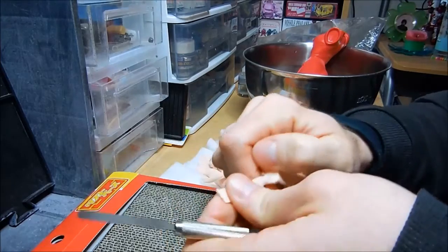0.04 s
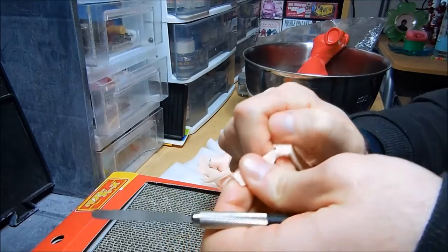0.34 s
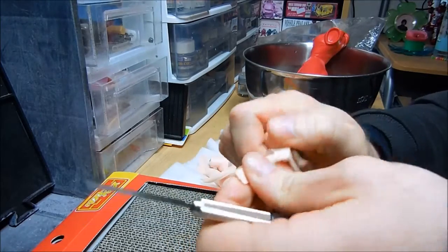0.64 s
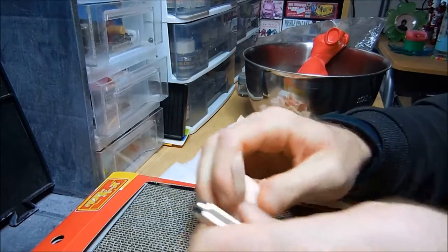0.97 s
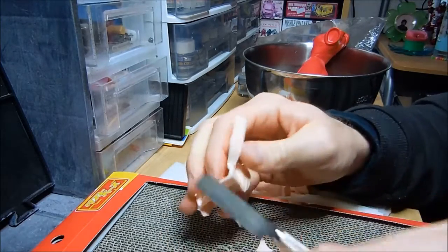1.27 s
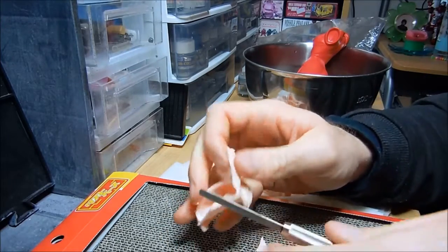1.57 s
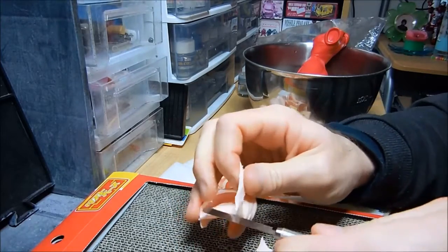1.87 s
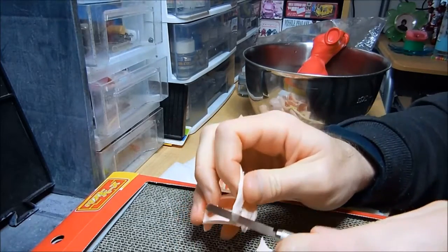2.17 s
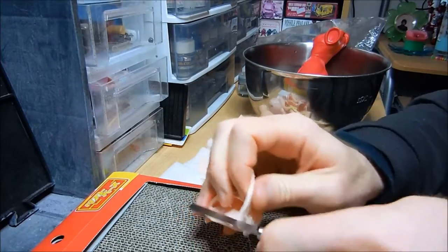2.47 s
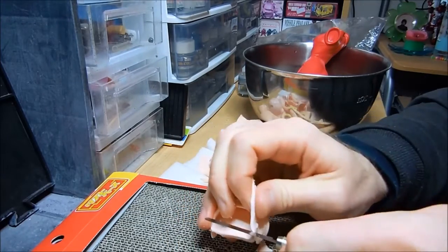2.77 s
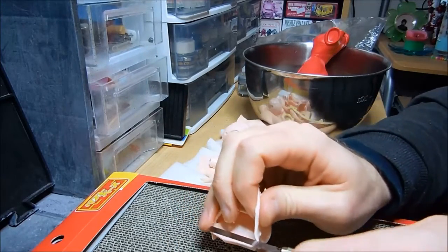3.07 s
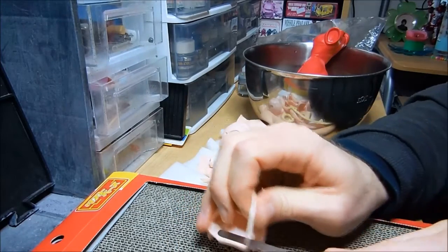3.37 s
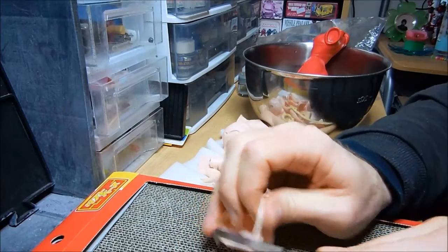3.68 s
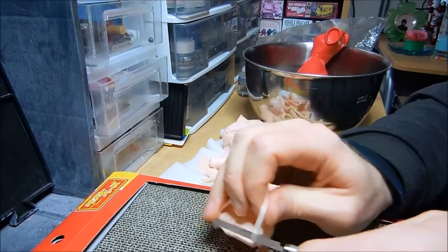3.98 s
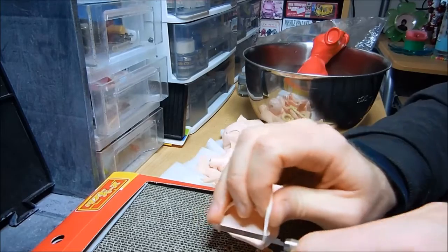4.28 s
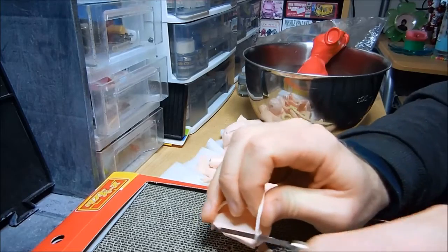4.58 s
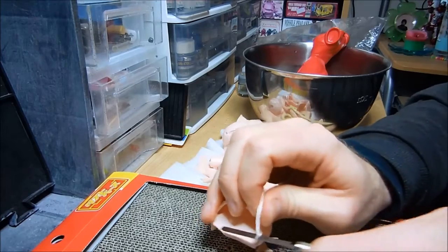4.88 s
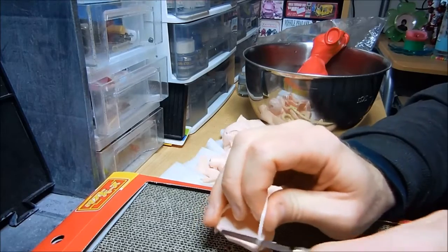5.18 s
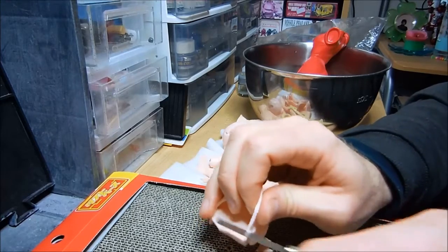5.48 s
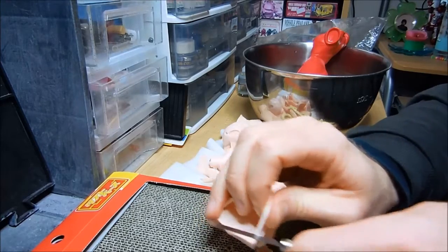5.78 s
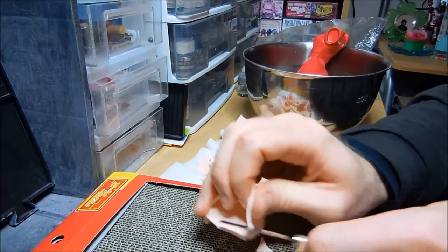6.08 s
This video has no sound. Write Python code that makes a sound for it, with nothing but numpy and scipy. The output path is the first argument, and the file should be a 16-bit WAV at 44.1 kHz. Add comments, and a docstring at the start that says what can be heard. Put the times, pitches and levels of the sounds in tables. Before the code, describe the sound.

A small blade trims a hand-held piece of soft vinyl in short, dry, ticking scrapes and snaps in a quiet room.

```python
"""At a workbench in a small, faintly humming room, a small blade trims a hand-held piece of soft vinyl.
In each cut the pressure swells and fades while the edge sticks and slips in a quick uneven run of dry
ticks, rasping between them; now and then it snaps through. Fingers rub the part, hands bump softly,
a sleeve rustles. Bench, boxes and room reflect the cutting and rubbing."""
import sys
import numpy as np
from scipy import signal
from scipy.fft import rfft, irfft
from scipy.io import wavfile
from scipy.ndimage import uniform_filter1d

SR = 44100
rng = np.random.default_rng(int(sys.argv[2]) if len(sys.argv) > 2 else 0)


def transcribe(u):
    """Save the signal u as a 16-bit wav file named by the first command-line argument.

    u: samples, shape (n,) or (channels, n), limited to [-1, 1]; the rate is SR.
    q: integer samples, one column per channel.
    """
    v = np.clip(np.atleast_2d(u).T, -1, 1)
    q = np.round(v * 32767).astype(np.int16)
    wavfile.write(sys.argv[1], SR, q)


N = 275184

# Cuts through the vinyl. Each row: hardest moment, rise and fall in seconds, strength in dB,
# extra body near 1 kHz in dB, extra edge (treble) in dB.
CUTS = [(1.835, .01, 0.031, -53, 0.5, -2.5), (2.441, .034, 0.032, -43, 5, -1),
        (3.254, .004, 0.037, -40, 2, -3), (3.4163, .009, .012, -54.5, 11, -2),
        (3.695, .007, 0.062, -30.5, -1.5, -3), (3.83, 0.056, 0.033, -33, 8, 4),
        (3.99, 0.016, 0.031, -40.5, -0.5, 0), (4.058, .005, .022, -53, 3, 4),
        (4.2255, .014, 0.03, -35.5, 1.5, -6), (4.369, 0.018, .036, -34.5, -0.5, 4),
        (4.527, 0.016, 0.014, -49, -1, 4.5), (4.607, .005, 0.019, -53, 6, 2),
        (4.7428, 0.028, 0.04, -42.5, 0, -2), (4.8841, 0.045, 0.034, -40, -5.5, 1.5),
        (5.0233, .005, 0.039, -50, 3, 4.5), (5.3806, 0.018, 0.053, -46.5, 2, 4),
        (5.5263, 0.035, .043, -44.5, 2, 3.5), (5.9245, .004, 0.025, -55, -2, -2),
        (6.0709, 0.0084, 0.058, -42.5, 1, 2.5)]
TICK_RING_HZ = 2820  # a bright ring colouring ticks and rasps


def stick_slip(per_side=10, gap_s=.0066, gap_spread=.25, lesser_db=-2.5,
               spread_db=4, body_spread_db=3.5, ring_spread=.04):
    """The edge sticks and slips unevenly around each cut's hardest moment, each bite to its own depth."""
    rows = []
    lesser = np.arange(-per_side, per_side + 1) != 0
    for hardest_s, rise_s, fall_s, db, body_db, edge_db in CUTS:
        gap, size, depth, ring = rng.standard_normal((4, len(lesser))) * lesser
        t = np.cumsum(gap_s * np.exp(gap_spread * gap))
        t -= t[per_side]
        slip_db = db + pressure_db(t, rise_s, fall_s) + lesser_db * lesser + spread_db * np.tanh(size)
        bite_db = body_db + body_spread_db * depth
        ring_hz = TICK_RING_HZ * (1 + ring_spread * ring)
        rows += zip(hardest_s + t, slip_db, bite_db, np.full(len(t), edge_db), ring_hz)
    return slips(rows, creep=.57, ring_db=6)


def snaps():
    """Single snaps as the edge bites in or breaks through."""
    # Each row: time in seconds, strength, extra body and extra edge in dB, bright ring in Hz.
    breaks = [(1.983, -55.5, 6, -11, 2780), (2.0305, -42, -7.5, 0, 3590), (2.12, -64, 2, -3, 2800),
              (2.3829, -30.5, 1.5, -9.5, 3000), (2.3865, -36, -1, 0, 2900), (2.4101, -33.5, 5.5, -1, 3040),
              (2.4621, -43.5, 11, 3, 3020), (2.4672, -41.5, 4, -10, 1750), (2.7276, -51, -4, 9, 3840),
              (2.758, -63.5, -7, 16.5, 2800), (2.906, -58.5, 2, 13.5, 2770),
              (3.0612, -42.5, -29, 4.5, 3050), (3.2488, -30.5, 3, -1.5, 3140), (3.2674, -42, 0.5, 1, 2870),
              (3.6859, -16, -11.5, -7.5, 2860), (3.7886, -43.5, 8, 6, 3200), (3.7995, -39.5, 6, 3, 2900),
              (3.8681, -41, -7, -3, 2600), (3.9646, -30, -5, -8.5, 2840), (4.0672, -39, 12, 2, 2970),
              (4.2185, -30, -8, -2.5, 2850), (4.3415, -39, 3, 7.5, 3130), (4.3548, -34, -1, 3.5, 3020),
              (4.359, -34, -7, 4.5, 2790), (4.6119, -37.5, -3.5, -2, 2760), (4.7295, -46.5, 2, 0, 2740),
              (4.8541, -39, 3.5, 4, 2600), (4.8587, -39, -1.5, 13, 2550), (4.8787, -36, 0.5, 7, 3200),
              (4.9043, -46, 7.5, 7, 2900), (5.13, -42.5, -1.5, -1, 2570), (5.3535, -39.5, -9, -2.5, 2760),
              (5.3806, -38.5, -7, 3.5, 2680), (5.5523, -43, -0.5, 0.5, 2510), (5.6491, -53.5, 5, 7.5, 1770),
              (5.9346, -44.5, 3, 9, 2580)]
    return slips(breaks, creep=.61, ring_db=7)


def slips(rows, creep, ring_db, build_s=.00052, tear_s=.00086, creep_s=.00094,
          split_hz=4800, clean_db=-36, size=512):
    """Fine tearing builds, the edge lets go in one dull jolt, the tearing dies away."""
    out = np.zeros((2, N))
    t = (np.arange(size) - size // 4) / SR
    dull, bright = (signal.butter(2, split_hz, kind, fs=SR, output="sos") for kind in ("low", "high"))
    tear_envelope = np.exp(-np.maximum(-t / build_s, t / tear_s))
    for at_s, db, body_db, edge_db, ring_hz in rows:
        white = rng.standard_normal((4, size))
        if np.isinf(db):  # outside the stroke
            continue
        ragged = creep / (1 + amp(2 * (db - clean_db)))  # hard slips break clean, light ones crumble
        crumble = white[3] * np.exp(-abs(t) / creep_s)
        release = np.sqrt(1 - ragged) * (t == 0) + np.sqrt(ragged) * crumble / np.linalg.norm(crumble)
        tear = signal.sosfilt(bright, stereo(white[0], white[1:3]) * tear_envelope)
        force = signal.sosfilt(dull, release) + tear / np.linalg.norm(tear[0])
        response = tick(body_db, edge_db, ring_hz, ring_db)
        add(out, at_s + t[0], amp(db) * signal.fftconvolve(force, response[None], axes=1))
    return out


def tick(body_db, edge_db, ring_hz, ring_db, ring_width_hz=460, blade_share=1,
         half_free_db=-.5, edge_hz=4100, size=2048):
    """Minimum-phase response to one slip, with a bright ring: deep adds body, fine adds edge."""
    # Broad colour of a slip. Each row: frequency in Hz, level in dB.
    colour = [(60, -0.5), (250, 4.5), (480, 14.5), (680, 19), (1050, 25), (1600, 23), (2400, 26.5),
              (3250, 25.5), (4100, 18), (5400, 19.5), (7500, 12.5), (11000, 13.5), (14000, 9), (16000, -13)]
    # Where a deep cut adds body. Each row: frequency in Hz, share of body_db.
    body = [(350, 0.61), (700, 0.98), (1300, 0.87), (1900, 0.13)]
    # Modes of the part with its surroundings, and of the free blade.
    # Each row: centre in Hz, width in Hz, lift in dB.
    part_modes = [(698, 46, 5), (1003, 70, 5.5), (1219, 109, 9), (4780, 710, 1.5), (8850, 580, 5)]
    blade_modes = [(1850, 130, 10), (2900, 470, 3), (3150, 230, 4), (6060, 330, 11)]
    hz = abs(np.fft.fftfreq(size, 1 / SR))
    db = read(colour, hz) + resonance_db([*part_modes, (ring_hz, ring_width_hz, ring_db)], hz)
    db += body_db * read(body, hz)
    db += edge_db * (1 - 1 / (1 + (hz / edge_hz) ** 8))
    # Deep vinyl damps the blade; a shallow slip frees its modes, which shift in step with ring_hz.
    free = 1 / (1 + amp(2 * (body_db - half_free_db)))
    db += blade_share * free * resonance_db(blade_modes, hz * TICK_RING_HZ / ring_hz)
    spectrum = np.exp(signal.hilbert(np.log(amp(db))).conj())
    return np.fft.ifft(spectrum).real[:size // 2]


def pressure_db(t, rise_s, fall_s, fade_db=17.5, roundness=1.36):
    """Stroke pressure: swells to t = 0, then fades; no contact outside the stroke."""
    away = np.maximum(-t / rise_s, t / fall_s)
    return np.where(away <= 1, -fade_db * away ** roundness, -np.inf)


def blade_rasp():
    """The edge rasps between slips."""
    return amp(-11.5) * friction(CUTS, grains_per_s=5000, catches_per_s=170, catch_db=10.5, grit_db=2,
                                 ring_hz=2860, ring_db=4, ring_width_hz=520, blade_share=.92)


def finger_rubs():
    """Fingers slide over part and handle."""
    # Each row: hardest moment, rise and fall in seconds, level, extra body and extra edge in dB.
    rubs = [(.62, .03, 0.073, -59.5, 5, 7), (.715, 0.017, .05, -62.5, -4, 5),
            (.83, 0.073, .025, -56.5, -5, 5), (.855, .02, 0.011, -42, -13.5, -7),
            (1.1, .17, .05, -66.5, 4, 7), (1.33, 0.093, 0.075, -65.5, 0, 12),
            (1.49, 0.017, 0.015, -52, 2, 12.5), (2.71, 0.088, .05, -66.5, 3, 12),
            (3.28, 0.012, .09, -61, 3, 14), (3.645, 0.034, 0.026, -61.5, 10, 7),
            (5.215, 0.029, 0.084, -63, 7, 7), (5.825, 0.02, 0.043, -62.5, -6, 12)]
    return friction(rubs, grains_per_s=8900, catches_per_s=130, catch_db=9, grit_db=3,
                    ring_hz=2710, ring_db=13, ring_width_hz=660, blade_share=.2)


def friction(strokes, grains_per_s, catches_per_s, catch_db, grit_db,
             ring_hz, ring_db, ring_width_hz, blade_share):
    """Tiny releases under swelling and fading pressure, strongest each time the contact catches."""
    out, t = np.zeros((2, N)), np.arange(N) / SR
    sizes = np.tanh(rng.standard_normal((3, N))) * (rng.random(N) < grains_per_s / SR)
    sizes *= amp(grit_db * np.minimum(rng.exponential(size=N), 5))  # a few much coarser grains
    pace = np.exp(.4 * unit(uniform_filter1d(rng.standard_normal(N), size=200)))
    catch_phase = np.cumsum(catches_per_s * pace) / SR % 1
    for hardest_s, rise_s, fall_s, db, body_db, edge_db in strokes:
        at = np.flatnonzero((t > hardest_s - rise_s) & (t < hardest_s + fall_s))
        grains = stereo(sizes[0, at], sizes[1:, at]) * amp(-catch_db * catch_phase[at])
        response = tick(body_db, edge_db, ring_hz, ring_db, ring_width_hz, blade_share)
        rasp = unit(signal.fftconvolve(grains, response[None], axes=1)[:, :len(at)])
        add(out, t[at[0]], rasp * amp(db + pressure_db(t[at] - hardest_s, rise_s, fall_s)))
    return out


def hand_bumps(bump_hz=292, rise_cycles=1.88, softness=4.48, rebound_db=-13, rebound_s=.017):
    """Padded blows swell and die within a few cycles, then rebound once, weakly."""
    # Dull bumps of the hands. Each row: start in seconds, peak in dB.
    bumps = [(2.91, -51.5), (3.106, -53.5), (3.32, -54), (3.974, -54), (4.173, -52), (4.962, -54),
             (5.456, -55.5), (6.015, -55.5), (6.223, -52)]
    # One light knock as the grip changes: start in seconds, peak in dB, pitch in Hz.
    knock = (1.4348, -48.5, 900)
    out, t = np.zeros(N), np.arange(SR // 10) / SR
    for start_s, db, hz in [knock] + [(*bump, bump_hz) for bump in bumps]:
        age = t * hz / rise_cycles
        envelope = (age * np.exp(1 - age)) ** softness
        blow = -amp(db) * envelope * np.sin(2 * np.pi * hz * t)
        add(out, start_s, blow)
        add(out, start_s + rebound_s, amp(rebound_db) * blow)
    return out


def bench_reflections(x, clutter_db=-15, clutter_t60_s=.066, room_db=-15.5):
    """Direct sound, single echoes, scatter from nearby clutter and the room's short tail."""
    # Echoes off bench, hands and boxes, a left and a right list. Each row: delay in ms, gain.
    echoes = [
        [(1.06, .08), (1.42, 0.22), (2.87, 0.19)],
        [(.7, 0.13), (1.06, 0.055), (2.87, 0.52)],
    ]
    # Room decay. Each row: frequency in Hz, T60 in seconds.
    room_decay = [(200, 0.82), (1000, 0.14), (3000, 0.15), (12000, 0.049)]
    paths = amp(clutter_db) * scatter([(1000, clutter_t60_s)], onset_s=.002)
    paths += amp(room_db) * scatter(room_decay, onset_s=.006)
    paths[:, 0] += 1
    ms = np.arange(paths.shape[1]) * 1000 / SR
    paths += [sum(gain * np.sinc((ms - delay_ms) / ms[1]) for delay_ms, gain in side) for side in echoes]
    return signal.fftconvolve(x, paths, axes=1)[:, :N]


def scatter(decay, onset_s):
    """Dense stereo reflections of about unit energy, dying band by band."""
    hz, t, bands = signal.stft(rng.standard_normal((3, SR // 2)), SR, nperseg=128)
    tails = signal.istft(bands * amp(-60 * t / read(decay, hz)[:, None]), SR, nperseg=128)[1]
    tails = np.pad(tails, ((0, 0), (round(onset_s * SR), 0)))[:, :SR // 3]
    tails /= np.linalg.norm(tails[0])
    return stereo(tails[0], tails[1:])


def sleeve():
    """Cloth rustles faintly, mostly at the start."""
    # Each row: time in seconds, level in dB.
    levels = [(0, -63.5), (.12, -68), (.3, -75.5), (.6, -72), (.9, -97), (1.3, -89), (1.6, -103),
              (6.24, -79)]
    # Cloth spectrum. Each row: frequency in Hz, relative density in dB.
    cloth = [(100, -5.5), (450, -9.5), (850, 5), (1500, -4), (4000, -16), (15000, -20.5)]
    return amp(np.interp(np.arange(N) / SR, *np.transpose(levels))) * noise(cloth)


def room_tone(air_db=-64.5):
    """Still air, hiss and a steady hum."""
    # Spectrum of air and hiss. Each row: frequency in Hz, relative density in dB.
    colour = [(30, -32), (48, -7), (85, -10.5), (135, -3.5), (200, -3), (450, -3), (750, 0), (1200, 0),
              (1600, -1), (3000, -3), (5000, -7), (10000, -12), (15500, -17.5)]
    # Hum tones. Each row: frequency in Hz, rms level in dB.
    tones = [(41, -88), (120, -80.5)]
    t = np.arange(N) / SR
    air = amp(air_db) * stereo(noise(colour), [noise(colour), noise(colour)])
    hum = sum(amp(db) * np.sqrt(2) * np.sin(2 * np.pi * hz * t) for hz, db in tones)
    return air + hum


def stereo(shared, own):
    """Two close listening points: long waves reach both alike, short ones differ."""
    # Each row: frequency in Hz, left-right likeness from 0 to 1.
    likeness = [(40, 0.87), (300, 0.45), (1200, 0.39), (3000, 0.18), (6000, 0.14), (13000, 0.23)]
    size = len(shared)
    alike = read(likeness, np.fft.rfftfreq(size, 1 / SR))
    return irfft(rfft(shared) * np.sqrt(alike) + rfft(own) * np.sqrt(1 - alike), size)


def resonance_db(modes, hz):
    """Summed lift of resonance peaks."""
    return sum(db / (1 + (2 * (hz - centre_hz) / width_hz) ** 2) for centre_hz, width_hz, db in modes)


def noise(colour):
    """Coloured Gaussian noise of rms 1."""
    gain = amp(read(colour, np.fft.rfftfreq(N, 1 / SR)))
    return unit(irfft(rfft(rng.standard_normal(N)) * gain, N))


def read(points, hz):
    """Interpolates a table over log frequency."""
    points_hz, values = np.transpose(points)
    return np.interp(np.log(hz + 1), np.log(points_hz), values)


def amp(db):
    """Decibels to gain."""
    return 10 ** (np.asarray(db) / 20)


def unit(x):
    """Scales to rms 1."""
    return x / np.sqrt(np.mean(x ** 2) + 1e-20)


def add(mix, start_s, sound):
    """Mixes a sound in at start_s."""
    part = mix[..., round(start_s * SR):][..., :sound.shape[-1]]
    part += sound[..., :part.shape[-1]]


def scene():
    """Blade and fingers at the bench, over the quiet room."""
    trimming = blade_rasp() + finger_rubs() + stick_slip() + snaps()
    return bench_reflections(trimming) + hand_bumps() + room_tone() + sleeve()


def record(dry):
    """Steep low-pass at 16.1 kHz."""
    low_pass = signal.firwin(401, 16100, window=("kaiser", 8), fs=SR)
    return signal.oaconvolve(dry, low_pass[None], "same")


dry = scene()
out = record(dry)
transcribe(out)
```